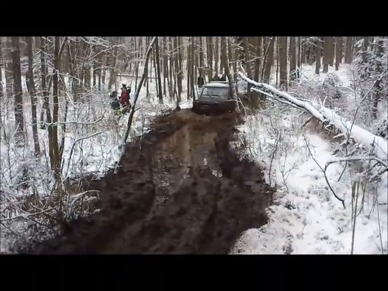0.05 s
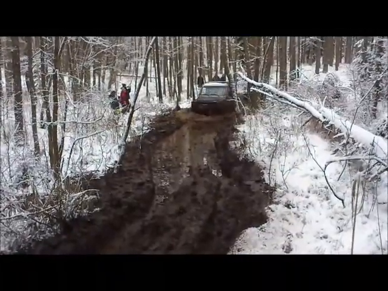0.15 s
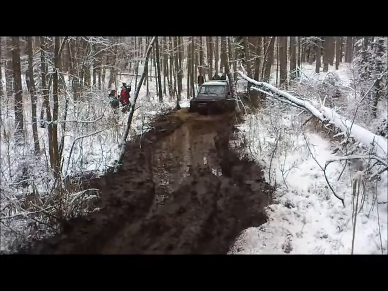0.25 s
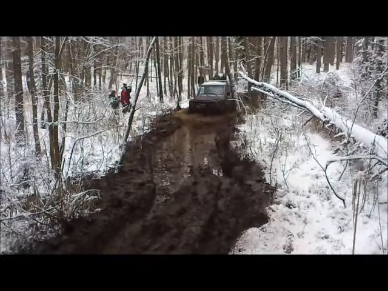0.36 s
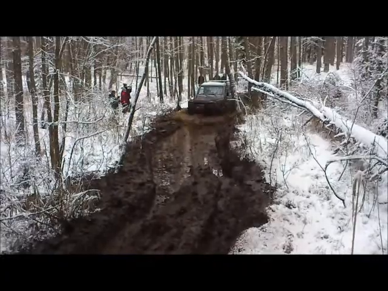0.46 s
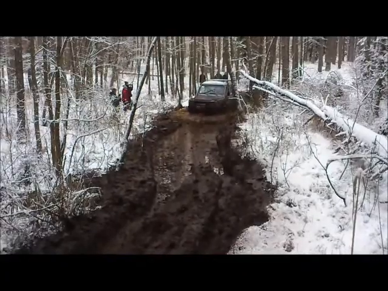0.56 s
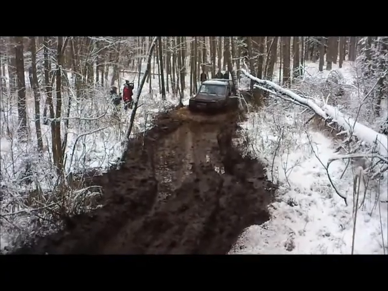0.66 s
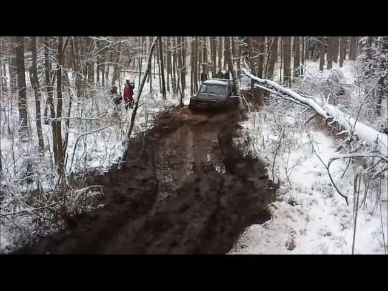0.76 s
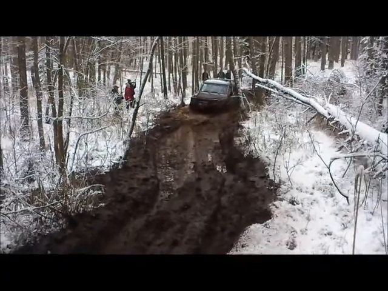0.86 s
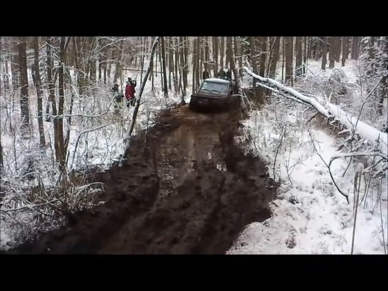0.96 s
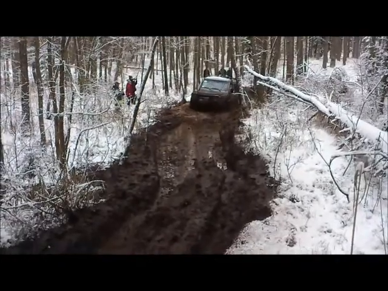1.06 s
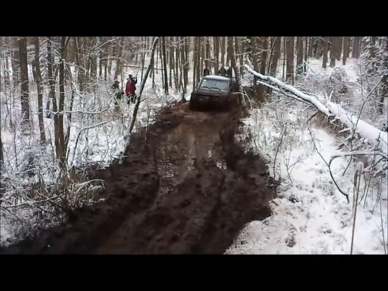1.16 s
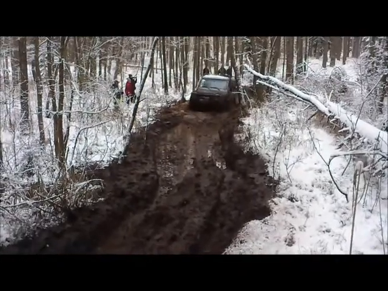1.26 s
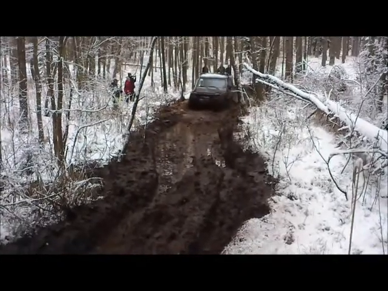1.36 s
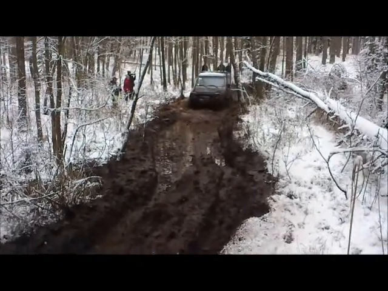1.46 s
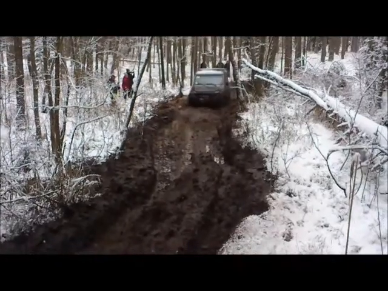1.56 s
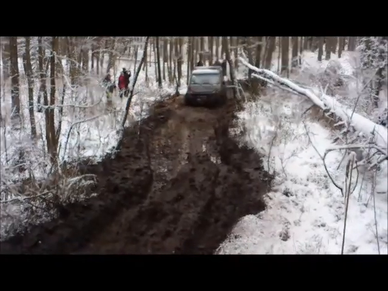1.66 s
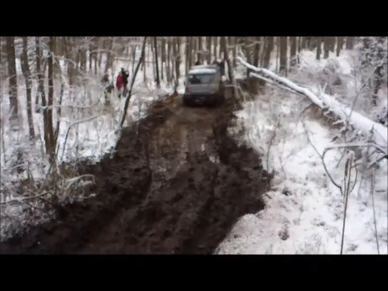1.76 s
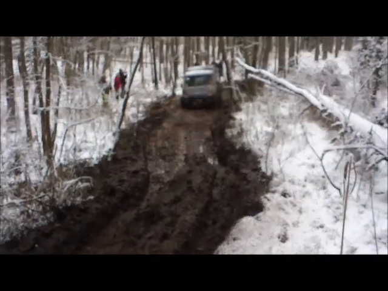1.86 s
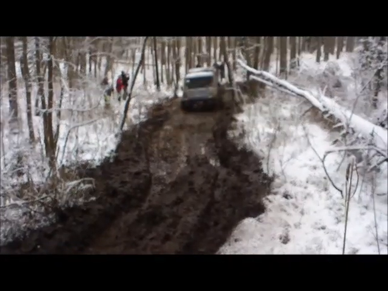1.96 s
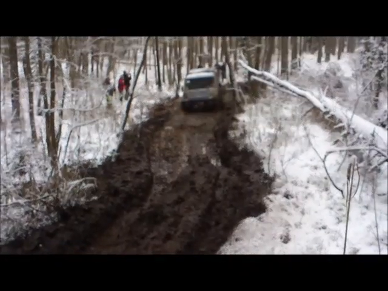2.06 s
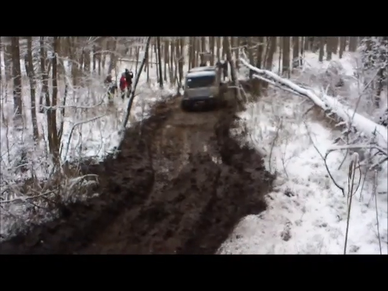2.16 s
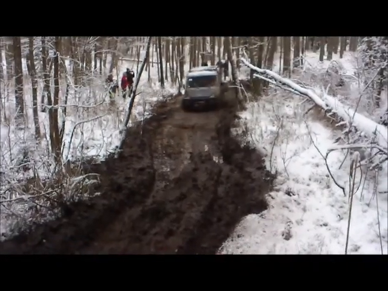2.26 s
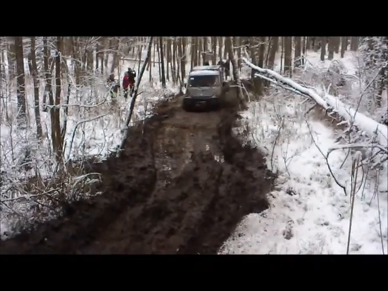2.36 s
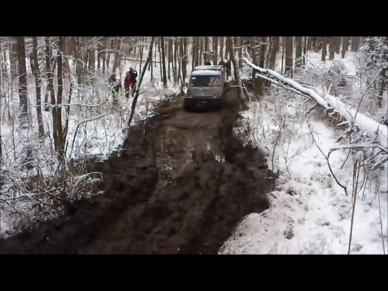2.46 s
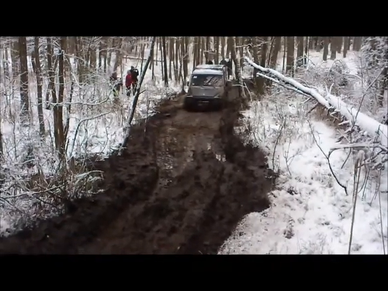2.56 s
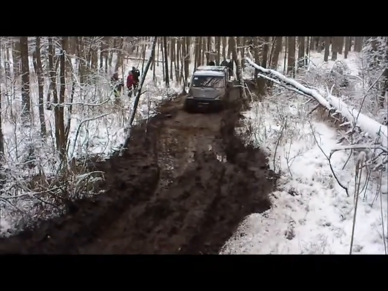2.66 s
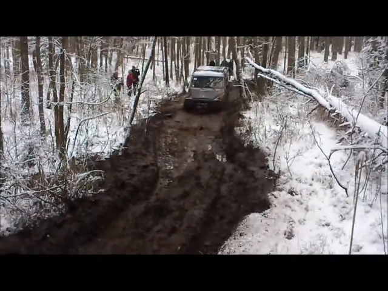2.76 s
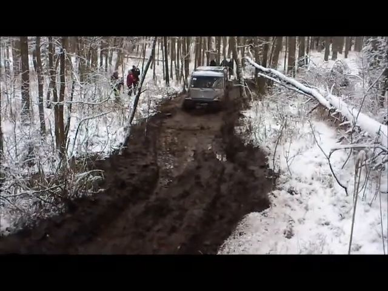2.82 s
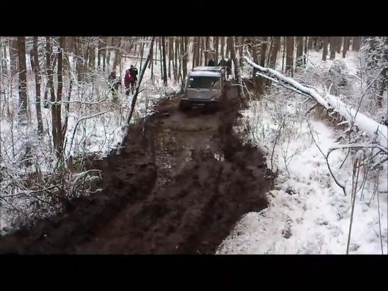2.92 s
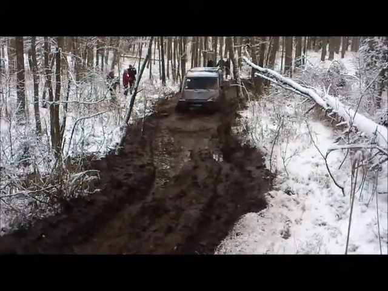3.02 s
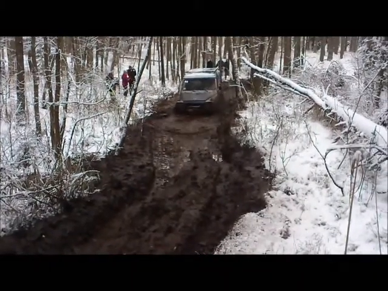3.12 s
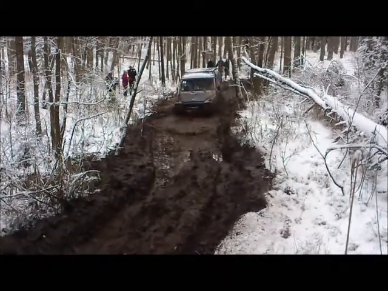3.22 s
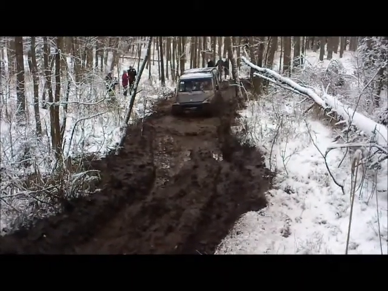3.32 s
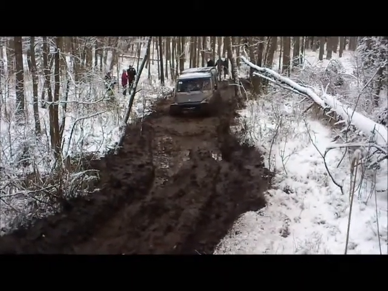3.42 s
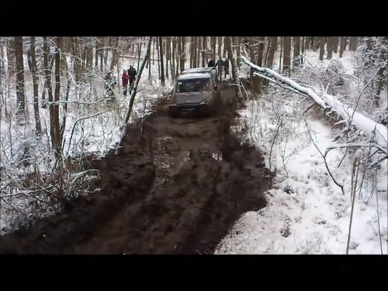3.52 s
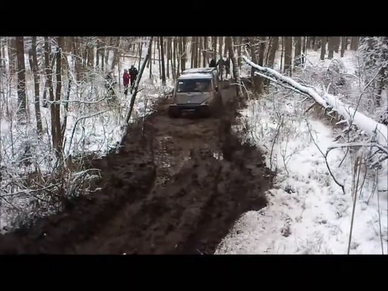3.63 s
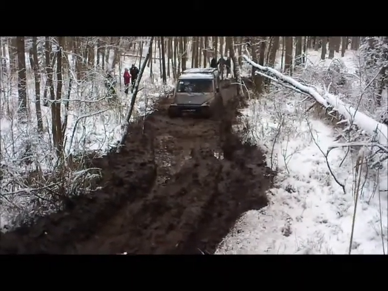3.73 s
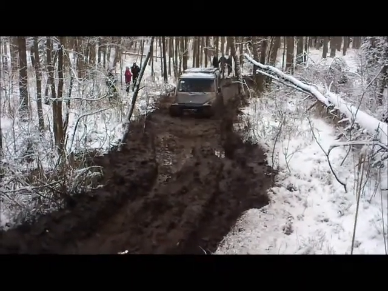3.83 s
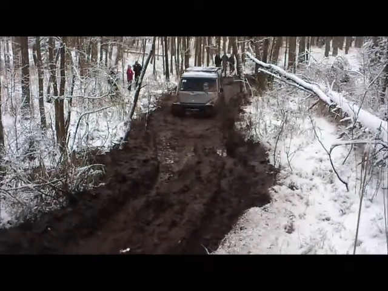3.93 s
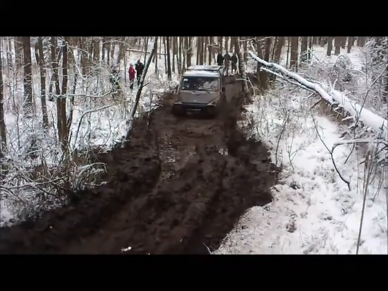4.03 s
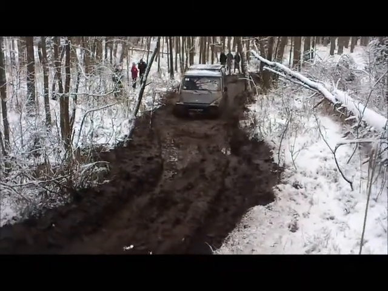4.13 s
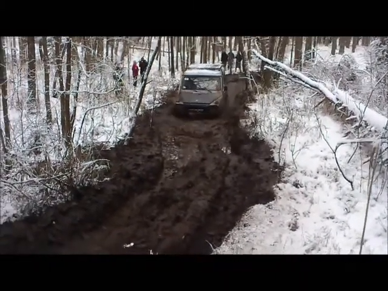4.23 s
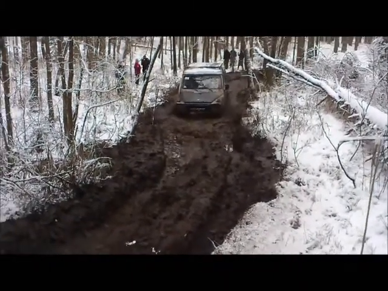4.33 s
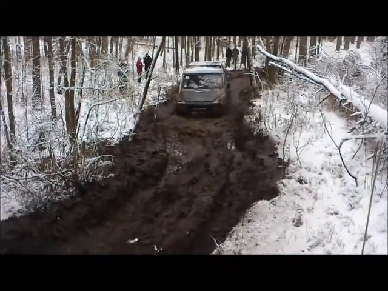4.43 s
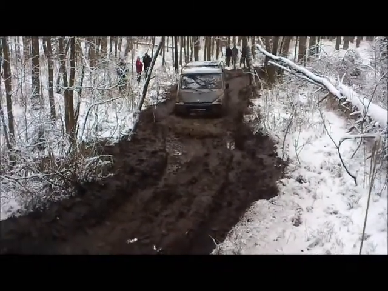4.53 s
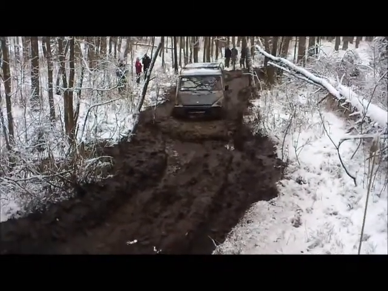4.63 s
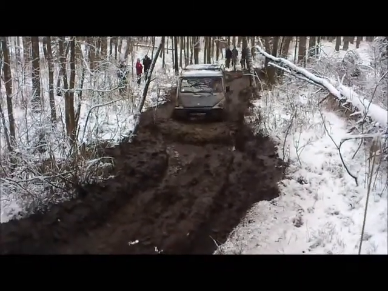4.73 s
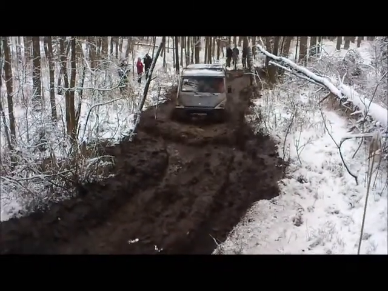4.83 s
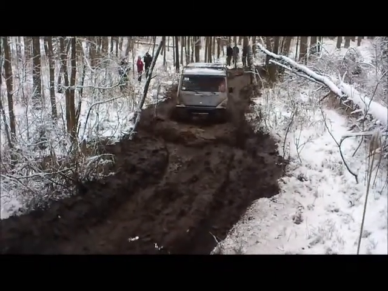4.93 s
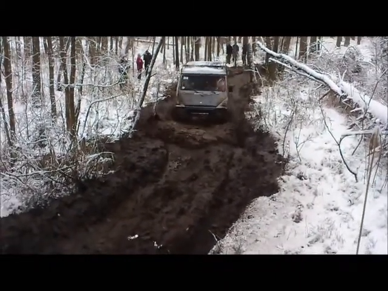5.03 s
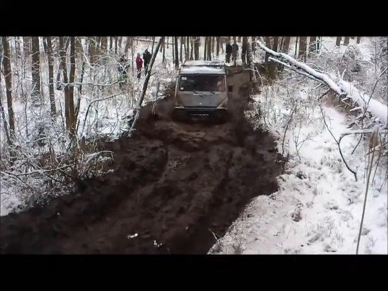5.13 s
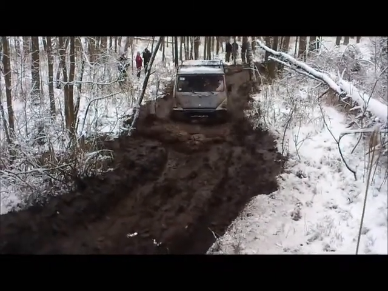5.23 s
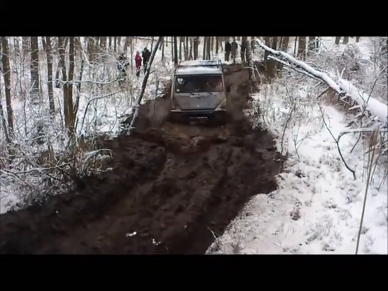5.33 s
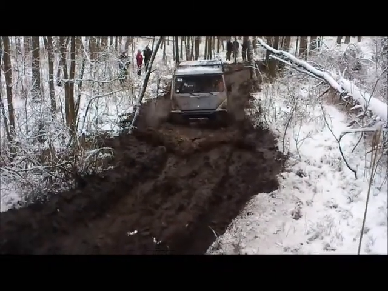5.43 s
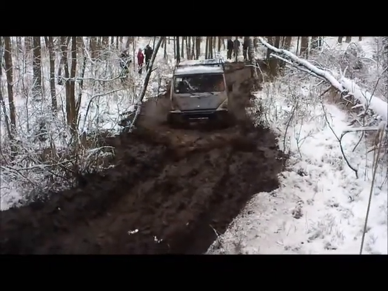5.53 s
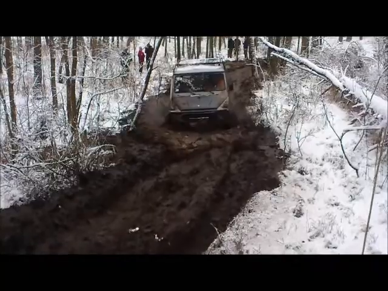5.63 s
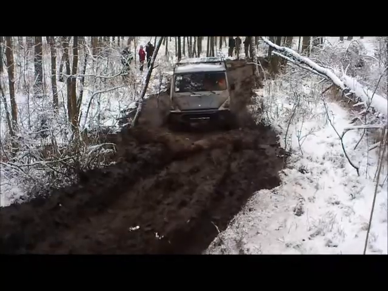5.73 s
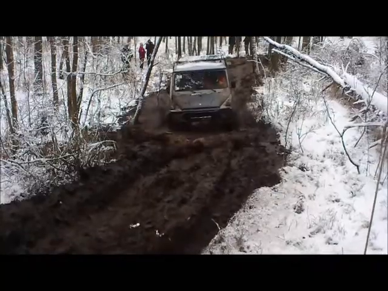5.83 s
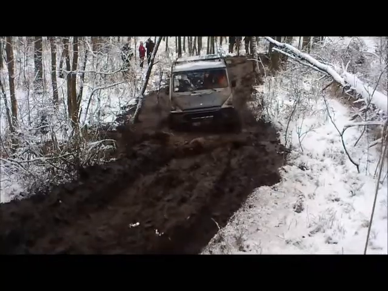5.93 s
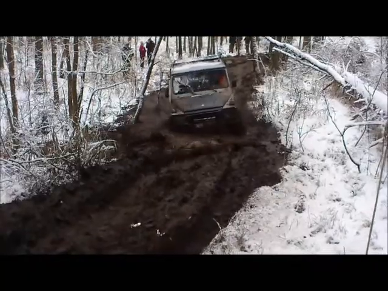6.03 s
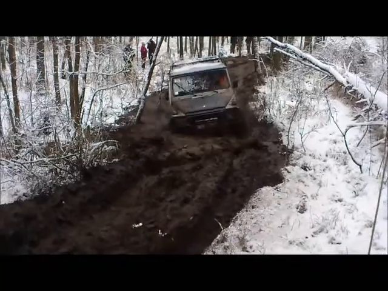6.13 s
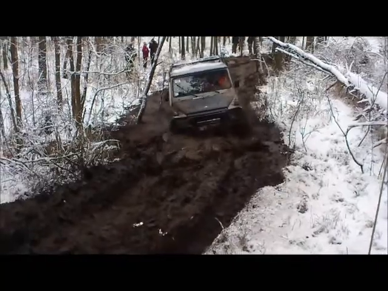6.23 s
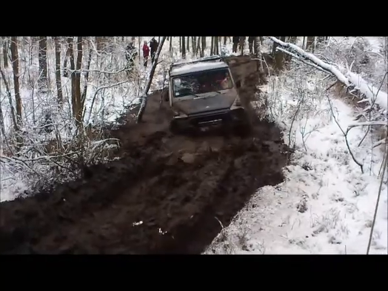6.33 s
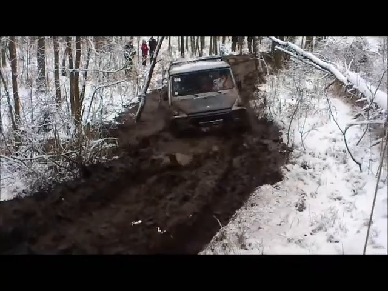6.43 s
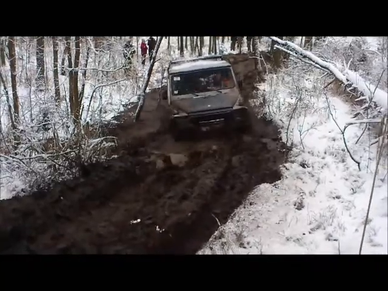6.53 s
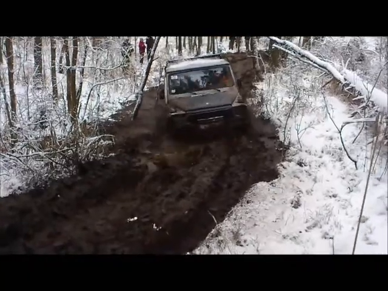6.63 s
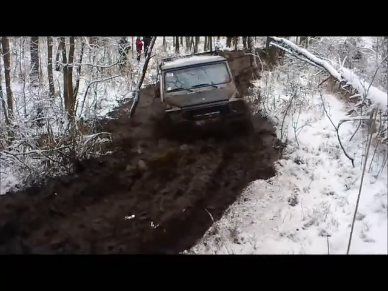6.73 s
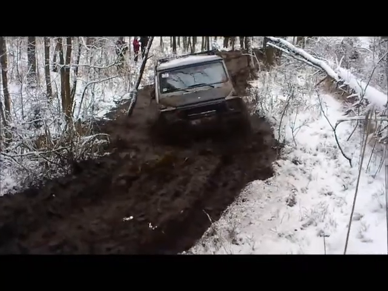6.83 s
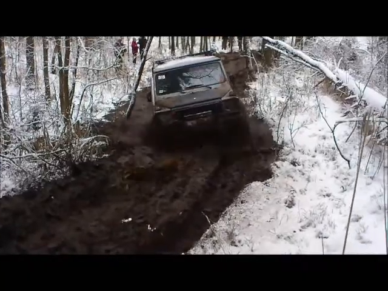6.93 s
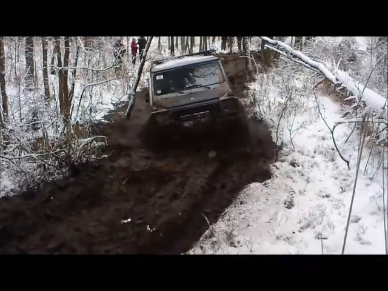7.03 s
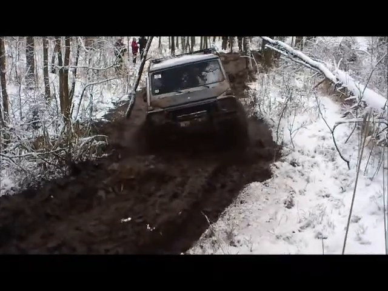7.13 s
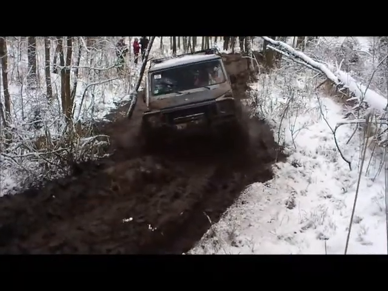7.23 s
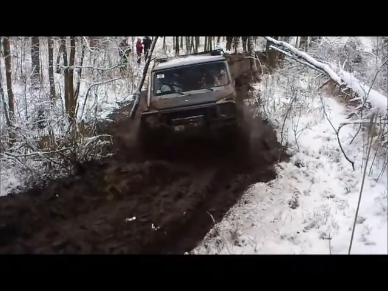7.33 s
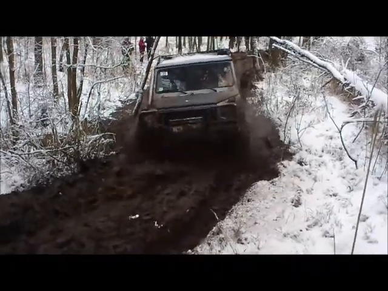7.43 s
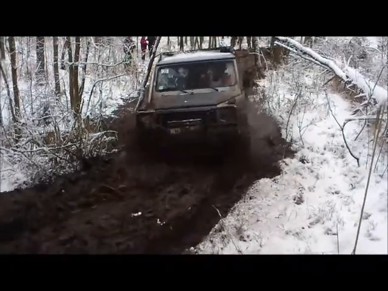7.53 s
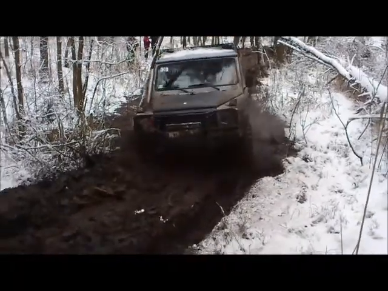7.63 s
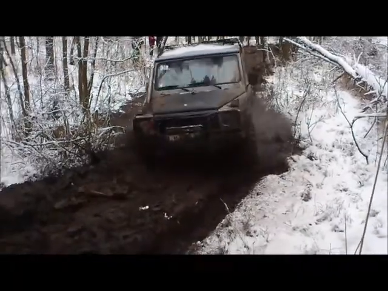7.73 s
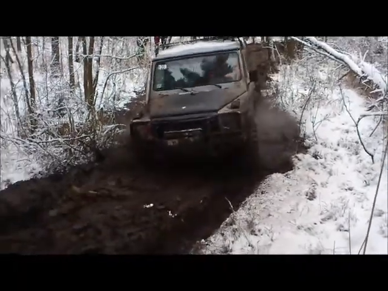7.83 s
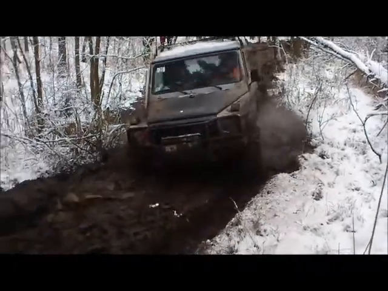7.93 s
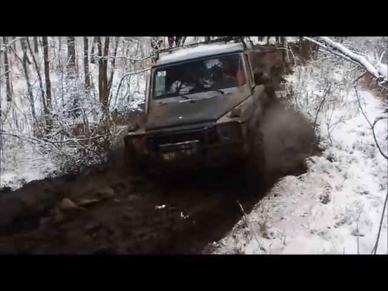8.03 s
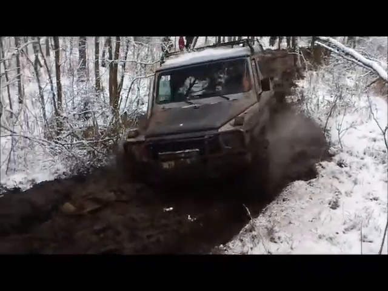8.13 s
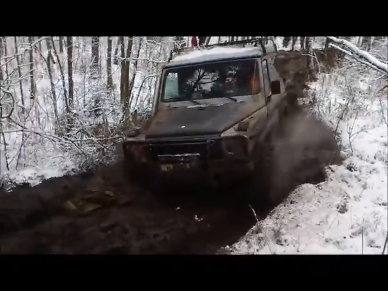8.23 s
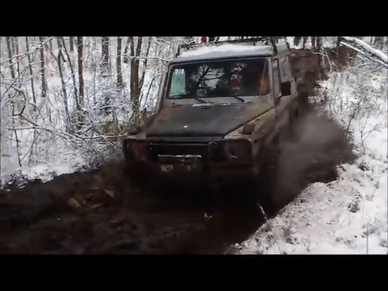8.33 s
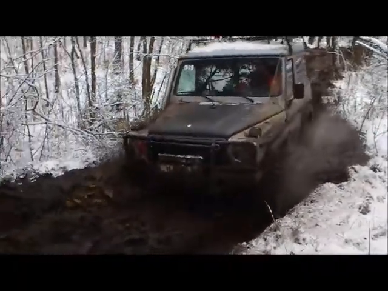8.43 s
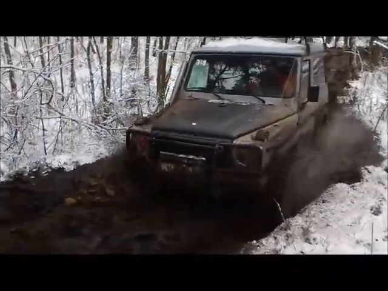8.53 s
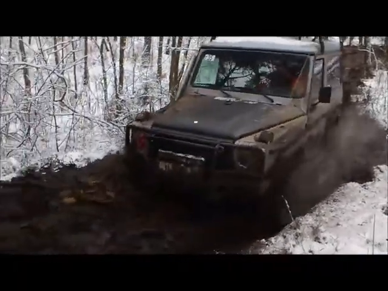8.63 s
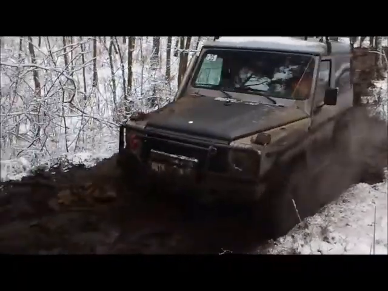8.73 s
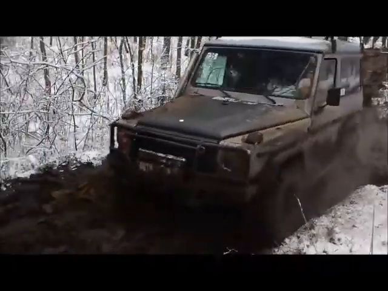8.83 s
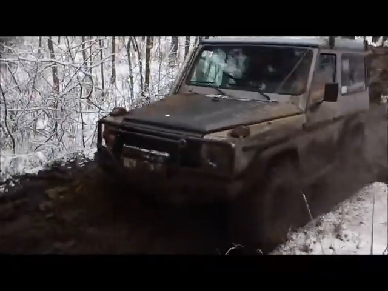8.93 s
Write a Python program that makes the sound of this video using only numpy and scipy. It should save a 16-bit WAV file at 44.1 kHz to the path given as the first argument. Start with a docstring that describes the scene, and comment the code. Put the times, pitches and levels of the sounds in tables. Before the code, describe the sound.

An off-road vehicle labours towards the microphone through a mud hole outdoors. Its low, buzzing exhaust drone surges and sags, with early throttle stabs and a few wet ticks and hollow gulps. Midway the pipe is muffled and choked by waves of mud while churning slush and spray rise. Finally the boom swells heavily, close up, with clattering engine block and bright hiss, the loudest puffs slightly overloaded.

```python
"""A five-cylinder off-roader labours through a deep mud hole and comes up close, its tailpipe booming.
The exhaust sums harmonics of the firing rate with ringing, uneven puffs; sloshing mud chokes it by turns.
The engine block clatters under load: noise gated by the firings and partly repeated in each cycle.
The tyres churn slush and throw up a hissing spray, made of patchy noise and clouds of tiny damped tones.
A faint rumble lies beneath; hollow gulps and sharp spits of mud dot the scene."""
import sys
import numpy as np
from scipy import signal
from scipy.fft import rfft, irfft, next_fast_len
from scipy.io import wavfile
from scipy.ndimage import uniform_filter1d, map_coordinates

SR = 44100
rng = np.random.default_rng(int(sys.argv[2]) if len(sys.argv) > 2 else 0)


def transcribe(signal):
    """Save signal, clipped to [-1, 1], as a 16-bit WAV file at the path in sys.argv[1]."""
    frames = np.atleast_2d(signal).T
    limited = np.clip(frames, -1, 1)
    pcm = np.round(limited * 32767).astype(np.int16)
    wavfile.write(sys.argv[1], SR, pcm)


N = 395577

# Engine pace, before smoothing and a slight tremble. Each row: time in seconds, firings a second.
FIRING_RATE = [(0.0, 71.4), (0.39, 59.2), (1.12, 73.0), (1.43, 67.5), (1.94, 81.0), (2.2, 54.8),
               (2.63, 76.7), (3.04, 69.8), (3.54, 71.1), (3.98, 82.9), (4.63, 77.0), (4.99, 91.2),
               (5.48, 68.1), (5.83, 82.6), (6.18, 89.1), (6.85, 85.0), (7.6, 84.3), (7.75, 80.6),
               (8.47, 78.5), (8.8, 79.6), (8.97, 76.4)]
# Base level of the tailpipe's boom, before the pipe's colour. Each row: time in seconds, level in dB.
BOOM_LEVEL = [(0, -23), (.88, -25.5), (1, -22), (1.58, -18), (2.07, -26), (2.27, -26.5), (2.49, -17),
              (2.72, -23.5), (3.76, -23), (4.95, -24), (5.45, -30), (5.87, -16.5), (6.19, -23.5),
              (7.07, -19), (7.68, -8.5), (8.16, -11.5), (8.44, -4.5), (8.97, -11)]
# Hardness of the puffs: overtones against the firing tone. Each row: time in seconds, base lift in dB.
PUFF_BITE = [(0, -8), (.45, -17), (.86, 0.5), (1.36, -7), (1.88, 5.5), (2.22, -3), (3.07, -4.5), (3.69, 5),
             (4.95, 9), (5.49, 5.5), (5.72, -4.5), (5.95, 3), (6.27, -8.5), (6.75, -6.5), (7.22, -3.5),
             (8.97, 0)]
# What the exhaust pipe passes. Each row: frequency in Hz, gain in dB.
PIPE_COLOUR = [(55, -1.5), (75, -1), (90, 4), (120, -7), (145, -1.5), (165, -0.5), (185, -3), (213, -12.5),
               (240, -4.5), (275, -6)]
# Each entry: how far one cylinder's puff departs from the mean, in firing order, as a relative strength.
CYLINDER_OFFSETS = [.95, -.9, .45, .3, -.8]
# The silencer's throbbing resonances. Each row: centre in Hz, width in Hz, relative level in dB.
SILENCER_MODES = [(132.4, 6.7, 4.5), (190, 34, -1), (264.1, 21, 4.5)]
# The tailpipe's rasping resonances. Each row: centre in Hz, width in Hz, relative level in dB.
TAILPIPE_MODES = [(342.5, 45, 4), (543, 85, -13)]
# Stabs of throttle; exhaust and block each take their own share.
# Each row: centre in seconds, lift in dB on the exhaust's edge, half width in seconds.
THROTTLE_STABS = [(1.1, 4.5, 0.28), (1.8, 7.5, 0.15), (2.7, 2, 0.15), (7.25, 21.5, 0.096),
                  (7.62, 5.5, .035), (7.92, 9.5, 0.056)]
# Runs of even waves of mud slopping over the tailpipe; overtones lose more than the firing tone.
# Each row: first wave in seconds, last wave in seconds, number of waves, greatest depth in dB.
MUD_WAVES = [(3.678, 4.79, 9, 4.5), (5.775, 6.014, 3, 13), (6.45, 7.163, 6, 4), (7.295, 8.434, 9, 7)]
# The tail drops into a rut and mud plugs the pipe; overtones lose more than the firing tone.
# Each row: centre in seconds, depth in dB, half width in seconds.
RUT_PLUNGES = [(2.062, 10, 0.026), (2.206, 18, 0.021), (5.195, 6, 0.028), (5.56, 2, 0.032),
               (6.184, 14, 0.053), (6.46, 8, .035), (7.49, 6.5, .04)]
# Colour of the block's clatter. Each row: frequency in Hz, relative density in dB per Hz.
BLOCK_SPECTRUM = [(500, -31), (1020, -5), (1140, 4.5), (1270, -0.5), (1385, 4.5), (1490, -6.5), (1575, 2),
                  (1800, -22), (3000, -5), (6000, -33)]
# Tyres at work, before the trims. Each row: time in seconds, slush level in dB, spray level in dB.
TYRE_WORK = [(0, -41, -40.5), (1.5, -40, -39), (2.25, -42.5, -42), (2.62, -40, -41), (2.85, -40, -39.5),
             (4.6, -38.5, -37), (4.85, -33.5, -32.5), (5.45, -33, -32.5), (6.25, -28.5, -29),
             (6.85, -29.5, -30), (7.55, -29, -24.5), (8.6, -28, -27.5), (8.97, -28, -26.8)]
# Colour of the churned slush. Each row: frequency in Hz, relative density in dB per Hz.
SLUSH_SPECTRUM = [(20, -14), (55, -3.5), (95, -2.5), (140, 4.5), (210, -4), (310, 0.5), (380, 0.5),
                  (490, 2.5), (620, -2), (850, -2), (1100, -6), (1700, -6), (2500, -9), (5000, -21)]
# Colour of the spray. Each row: frequency in Hz, relative density in dB per Hz.
SPRAY_SPECTRUM = [(200, -47), (700, -7.5), (1500, 1), (2200, 1), (3200, 0.5), (5000, -1.5), (6500, -2),
                  (8000, 0.5), (9600, 4), (11000, -3), (13000, -10), (15700, -16.5)]
# Colour of the low rumble. Each row: frequency in Hz, relative density in dB per Hz.
RUMBLE_SPECTRUM = [(15, -13), (45, -8), (70, 14), (120, -29), (400, -49)]
# Big bubbles gulping in the ruts.
# Each row: centre in seconds, peak level in dB, pitch at the centre in Hz, half width in seconds.
BUBBLE_GULPS = [(0.78, -31, 330, 0.022), (0.85, -30, 313, 0.033), (1.04, -34, 481, 0.063),
                (8.41, -24, 516, .02), (8.8, -22.5, 535, .015), (8.845, -25, 642, 0.024)]
# Single spits of mud. Each row: start in seconds, peak in dB before a common lift, band centre in Hz.
MUD_SPITS = [(0.8494, -25, 9600), (1.3174, -27, 5070), (1.3814, -22.5, 3850), (1.4262, -34, 3490),
             (2.2494, -35, 4910), (3.848, -24, 3890), (4.6402, -19, 8050)]
# Stereo width of the noises. Each row: frequency in Hz, left-right likeness from 0 to 1.
LIKENESS = [(200, 1), (500, 0.98), (1200, 0.78), (2200, 0.31), (4000, 0.36), (9000, 0.0)]
# The right microphone port is duller and notched.
# Each row: frequency in Hz, gain in dB, taken against the first row.
RIGHT_PORT_COLOUR = [(200, -2.5), (600, -2.5), (1500, 0), (2050, -13.5), (2700, -5), (5200, 1),
                     (6100, -6.5), (7000, -13), (9000, -14), (10500, -26), (12500, -13.5), (15500, -26)]

TOP_HZ = 15750  # nothing passes above this
PUFF_SCATTER = .1  # how much a puff varies from cycle to cycle, on the scale of the cylinder offsets
# the upper harmonics take a share of the bite; the oncoming body hides the tailpipe and dulls them
EDGE_SHARE, SHADE_DB = 0.39, -14.5
# in the deepest stretch the pipe runs under water, which muffles its edge and throb
WADE_FROM_S, WADE_TO_S, WADE_FADE_S, WADE_DB = 5.25, 7.52, 0.04, 14.5
WAVE_HALF_WIDTH_S, WAVE_SWELL = 0.027, 0.27  # swell: share of the depth that builds and ebbs over a run
# throb of the uneven cylinders against the boom, and what it loses as the nose turns towards the listener
BURBLE_DB, BURBLE_SHADE_DB = -12.5, -6
# the block clatters harder with speed up to full load, and grows as the vehicle approaches
CLATTER_DB, FULL_LOAD_HZ, CLATTER_DB_PER_HZ, APPROACH_DB_PER_S = -38, 80.9, 0.97, 0.83
SLUSH_TRIM_DB, SPRAY_TRIM_DB = 4.5, 5.5
# share of a stab that reaches the second harmonic; how much the boom gurgles under water when near
STAB_SHARE, GURGLE_DB = 0.31, 2.5
# the edge of the puffs flutters; the tailpipe rasps along with the edge, most of all in a stab
FLUTTER_DB, RASP_DB, RASP_STAB_SHARE = 2.15, -27.5, 0.39


def amp(db):
    """Decibels to gain."""
    return 10 ** (np.asarray(db) / 20)


def unit(x):
    """Scaled to rms 1."""
    return x / np.sqrt(np.mean(x ** 2) + 1e-20)


def along(points, hz):
    """(Hz, value) points read on a log frequency axis."""
    f, v = np.transpose(points)
    return np.interp(np.log(hz + 1), np.log(f + 1), v)


def curves(rows):
    """One value per sample for each column after the time."""
    s, *cols = np.transpose(rows)
    return [np.interp(np.arange(N) / SR, s, c) for c in cols]


def wobble(rate):
    """A smooth random curve, rate knots a second."""
    coarse = np.arange(0, N + 100, 100)
    values = map_coordinates(rng.standard_normal(size=1024), [coarse * rate / SR], mode="wrap")
    return np.interp(np.arange(N), coarse, values)


def swells(rows):
    """Sum of smooth bumps, one for each row of (s, height, half width s)."""
    t = np.arange(0, N, 100) / SR
    total = sum(height * np.exp(-((t - s) / width) ** 2) for s, height, width in rows)
    return np.interp(np.arange(N) / SR, t, total)


def filtered(x, response):
    """x shaped by a complex response of frequency."""
    m = next_fast_len(N + SR // 4, True)
    spectrum = rfft(x, m) * response(np.fft.rfftfreq(m, 1 / SR))
    return irfft(spectrum, m)[..., :N]


def spread(pair, spectrum):
    """Two unrelated signals become coloured stereo of rms 1, alike in the bass."""
    def response(hz):
        turn = np.arccos(np.clip(along(LIKENESS, hz), -1, 1)) / 2
        return amp(along(spectrum, hz)) * np.array([np.cos(turn), np.sin(turn)])
    mid, side = filtered(pair, response)
    return unit(np.array([mid + side, mid - side]))


def patchy(patchy_db):
    """Two noises with shared patches of random gain in time and frequency, rms 1."""
    z = signal.stft(rng.standard_normal((2, N)), nperseg=512)[2]
    field = uniform_filter1d(rng.standard_normal(z.shape[1:]), size=6, axis=0)
    field = uniform_filter1d(field, size=9, axis=1)
    noise = signal.istft(z * amp(patchy_db * unit(field)), nperseg=512)[1]
    return unit(noise[:, :N])


def grains(centre_hz, cycles, scatter_db, rise, count, size):
    """A cloud of short damped tones of scattered pitch and, if asked, strength; rms 1."""
    start = rng.integers(0, N, count)[:, None]
    hz = centre_hz * np.exp(.5 * rng.standard_normal((count, 1)))
    strength = amp(scatter_db * np.minimum(rng.exponential(size=(count, 1)), 4))
    # age 1 is reached after the given number of cycles
    age = hz * np.arange(size) / SR / cycles
    tone = np.sin(2 * np.pi * cycles * age * (1 + rise * age))
    ring = strength * np.exp(-3 * age) * tone
    return unit(np.bincount((start + np.arange(size)).ravel(), ring.ravel(), N)[:N])


def resonances(x, modes):
    """x rings a few broad modes, softened above 600 Hz; rms 1."""
    def response(f):
        total = 0
        for k, (centre, width, db) in enumerate(modes):
            mode = 1j * f * width / (centre * centre - f * f + 1j * f * width)
            total = total + (-1) ** k * amp(db) * mode
        return total / (1 + 1j * f / 600) ** 2
    return unit(filtered(x, response))


def crank():
    """Firings a second, smoothed over 50 ms; the speed trembles slightly."""
    rate = uniform_filter1d(curves(FIRING_RATE)[0], size=2205, mode="nearest")
    return rate * (1 + 0.003093 * wobble(25))


def nearness():
    """0 while the vehicle is far down the track, 1 when it arrives."""
    return np.interp(np.arange(N) / SR, [4.5, 8.3], [0, 1])


def wading():
    """1 while the tailpipe is under water, else 0, with short fades."""
    t = np.arange(N) / SR
    inside_s = np.minimum(t - WADE_FROM_S, WADE_TO_S - t)
    return np.clip(.5 + inside_s / WADE_FADE_S, 0, 1)


def choking():
    """Decibels lost while mud covers the tailpipe: runs of waves that build and ebb, and single plunges."""
    waves = []
    for first, last, count, depth in MUD_WAVES:
        count = round(count)
        arch = np.sin(np.pi * ((np.arange(count) + .5) / count) ** 1.7)
        depths = depth * (1 - WAVE_SWELL * (1 - arch))
        times = np.linspace(first, last, count)
        waves += [(s, db, WAVE_HALF_WIDTH_S) for s, db in zip(times, depths)]
    return swells(waves) + swells(RUT_PLUNGES)


def exhaust(rate, firings):
    """Steep-fronted puffs coloured by the pipe; unequal cylinders add a throb that rings the silencer."""
    boom_db, bite_db = curves(BOOM_LEVEL)[0], curves(PUFF_BITE)[0]
    phase, near, under = 2 * np.pi * firings, nearness(), wading()
    stab_db = swells(THROTTLE_STABS)
    bark_db = stab_db - WADE_DB * under
    choke_db = choking() + GURGLE_DB * under * near * wobble(28)
    # the body of the oncoming vehicle hides its tailpipe more and more: rounder, duller puffs
    skew, shade = np.pi / 2 * (1 - 2 * near / 3), amp(SHADE_DB * near)

    def harmonic(order):
        return np.cos(order * phase + (order - 1) * skew)

    def pipe_db(order):
        return along(PIPE_COLOUR, order * rate)

    firing_tone = amp(boom_db + pipe_db(order=1) - choke_db) * harmonic(order=1)
    second_db = boom_db + pipe_db(order=2) + bite_db + STAB_SHARE * stab_db - 1.65 * choke_db
    second = amp(second_db) * harmonic(order=2)

    # harder puffs steepen: each higher harmonic loses less against the one below
    force_db = boom_db + pipe_db(order=3) + EDGE_SHARE * bite_db + bark_db
    force_db = force_db + SHADE_DB * near - 1.22 * choke_db
    step = shade * amp(-6.0 + 0.32 * np.minimum(force_db + 28.5, 0))
    upper = harmonic(order=3) + step * harmonic(order=4) + .5 * step ** 2 * harmonic(order=5)
    edge = amp(force_db + FLUTTER_DB * wobble(45)) * upper

    # one impulse per firing carries only the cylinders' inequality
    at = np.flatnonzero(np.diff(np.floor(firings)))
    puffs = np.zeros(N)
    puffs[at] = np.resize(CYLINDER_OFFSETS, len(at)) + PUFF_SCATTER * rng.standard_normal(len(at))
    throb_db = boom_db + BURBLE_DB + BURBLE_SHADE_DB * near + 0.46 * bark_db - 1.45 * choke_db
    throb = amp(throb_db) * resonances(puffs, SILENCER_MODES)
    rasp_db = RASP_DB + 0.48 * force_db + RASP_STAB_SHARE * stab_db
    rasp = amp(rasp_db) * shade * resonances(puffs, TAILPIPE_MODES)
    return firing_tone + second + edge + throb + rasp


def clatter(rate, firings, repeat_share=0.35):
    """The block rattles at every firing, partly the same way in each cycle of five."""
    cycle = firings / len(CYLINDER_OFFSETS)
    pattern = rng.standard_normal(size=512)
    repeated = unit(map_coordinates(pattern, [cycle % 1 * len(pattern)], mode="grid-wrap"))
    share = np.clip(repeat_share, 0, 1)
    rattle = np.sqrt(1 - share) * rng.standard_normal((2, N))
    rattle[0] += np.sqrt(share) * repeated  # the repeated part sits in the middle
    gate = (1 + .45 * np.cos(2 * np.pi * firings)) * (1 + .3 * np.cos(2 * np.pi * cycle))
    load_db = CLATTER_DB_PER_HZ * np.minimum(rate - FULL_LOAD_HZ, 0) + 0.2 * swells(THROTTLE_STABS)
    level_db = CLATTER_DB + load_db + APPROACH_DB_PER_S * np.arange(N) / SR + wobble(14)
    return amp(level_db) * spread(rattle * gate, BLOCK_SPECTRUM)


def slush():
    """The tyres knead wet mud: a low rush full of bursting bubbles, each a short damped tone."""
    churn = spread(patchy(patchy_db=1.5), SLUSH_SPECTRUM)
    bubbles = grains(centre_hz=703, cycles=4.7, scatter_db=0.0, rise=0.043, count=1100, size=900)
    heave_db = .7 * wobble(10)
    level_db = curves(TYRE_WORK)[0] + SLUSH_TRIM_DB + heave_db
    return amp(level_db) * (churn + amp(-11.5) * bubbles)


def spray():
    """Thrown water hisses in clumps and its drops patter; the treble opens as the spray grows louder."""
    work_db = curves(TYRE_WORK)[1]
    drops = np.array([grains(centre_hz=4640, cycles=3.7, scatter_db=8.0, rise=0, count=5000, size=64)
                      for _ in range(2)])
    hiss = spread(patchy(patchy_db=1.12) + amp(-17) * drops, SPRAY_SPECTRUM)
    dull_share = np.clip((-28 - work_db) / 8, 0, 1)
    treble_loss = [(5000, -0.5), (10000, -3), (15000, -5.5)]  # Hz, dB
    dull = filtered(hiss, lambda hz: amp(along(treble_loss, hz)))
    level_db = work_db + SPRAY_TRIM_DB + 0.4 * wobble(18)
    return amp(level_db) * (dull_share * dull + (1 - dull_share) * hiss)


def rumble(db=-44):
    """A faint, slowly wavering low rumble hangs over the track: noise kept to the deep bass."""
    noise = spread(rng.standard_normal((2, N)), RUMBLE_SPECTRUM)
    return amp(db + 0.89 * wobble(3.25)) * noise


def gulps():
    """Trapped air escapes with a short hollow note that rises a little."""
    t, out = np.arange(N) / SR, np.zeros(N)
    for s, db, hz, width in BUBBLE_GULPS:
        close = np.abs(t - s) < 3 * width
        age = t[close] - s
        note = np.sin(2 * np.pi * hz * age * (1 + 0.11 * age))
        out[close] += amp(db) * np.exp(-(age / width) ** 2) * note
    return out


def spits(size=4096):
    """Each flung clot lands with a short wet tick: a band of noise dying 60 dB in 30 ms."""
    out, t = np.zeros((2, N + size)), np.arange(size) / SR
    for s, db, hz in MUD_SPITS:
        band = signal.butter(2, [hz - 1500, hz + 1500], "band", fs=SR)
        burst = rng.standard_normal((2, size)) * amp(-60 * t / .03)
        tick = signal.lfilter(*band, burst)
        out[:, round(s * SR):][:, :size] += amp(db + 3.5) * tick / np.abs(tick).max()
    return out[:, :N]


def scene():
    """Engine and mud together, straight ahead."""
    rate = crank()
    firings = np.cumsum(rate) / SR
    engine = exhaust(rate, firings) + clatter(rate, firings)
    mud = slush() + spray() + gulps() + spits()
    return engine + mud + rumble()


def record(dry):
    """Two unequal microphone ports that agree in the bass, then soft overload and a band limit."""
    delay = 2 / SR

    def right_response(hz):
        colour = amp(along(RIGHT_PORT_COLOUR, hz) - RIGHT_PORT_COLOUR[0][1])
        # the right port lags by the delay up to 2000 Hz, and by a constant phase above
        return colour * np.exp(-2j * np.pi * delay * np.minimum(hz, 2000))

    ports = np.array([dry[0], filtered(dry[1], right_response)])
    # the loudest puffs are rounded off at full scale
    rounded = ports / (1 + np.abs(ports) ** 16) ** (1 / 16)
    return filtered(rounded, lambda hz: hz < TOP_HZ)


dry = scene()
out = record(dry)
transcribe(out)
```